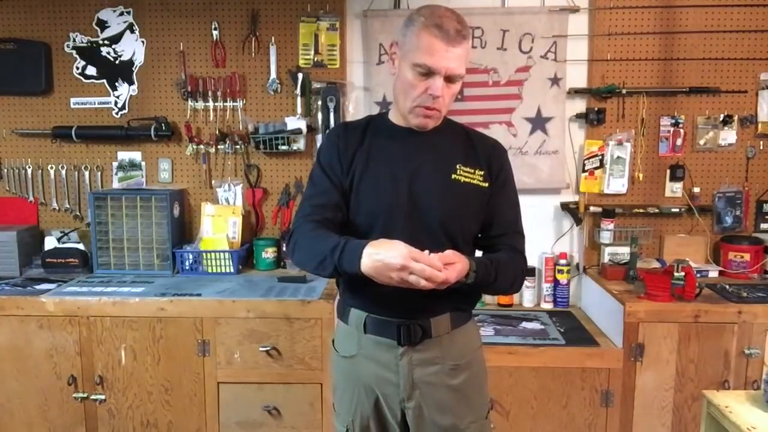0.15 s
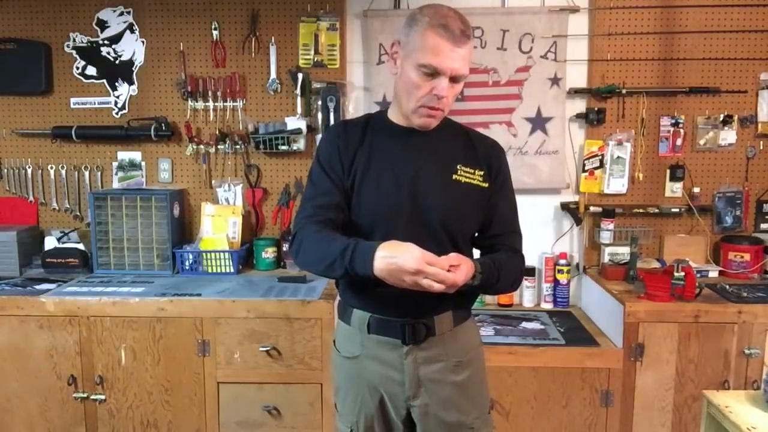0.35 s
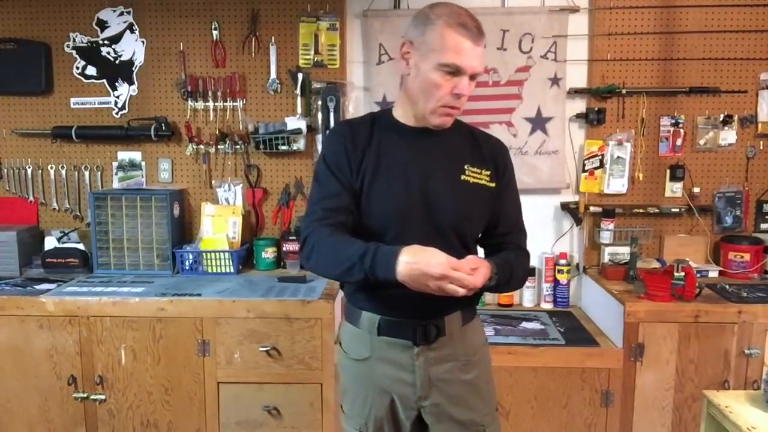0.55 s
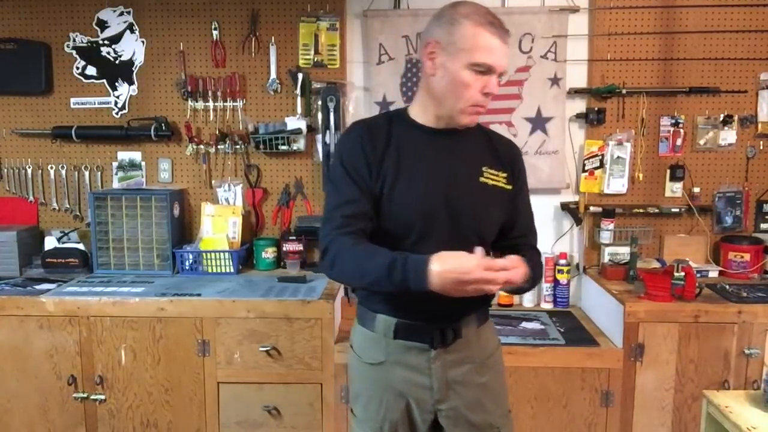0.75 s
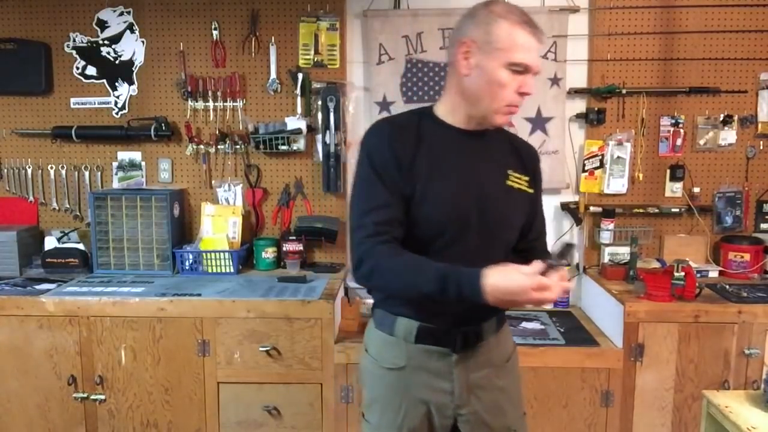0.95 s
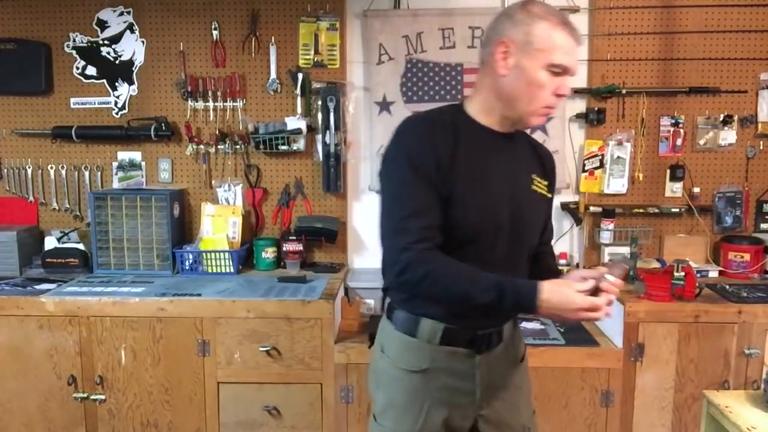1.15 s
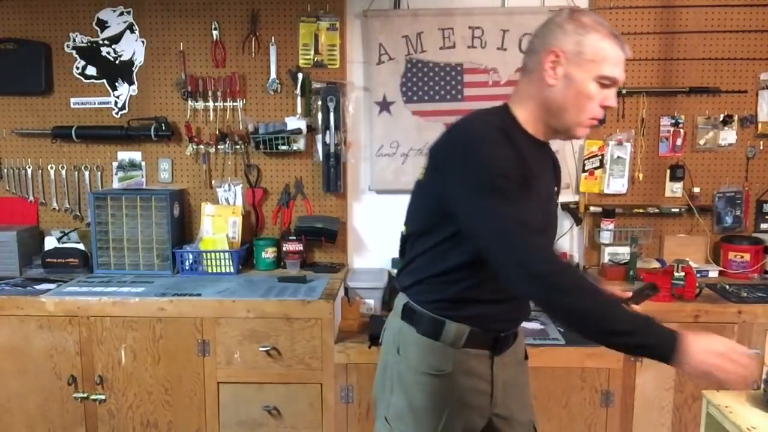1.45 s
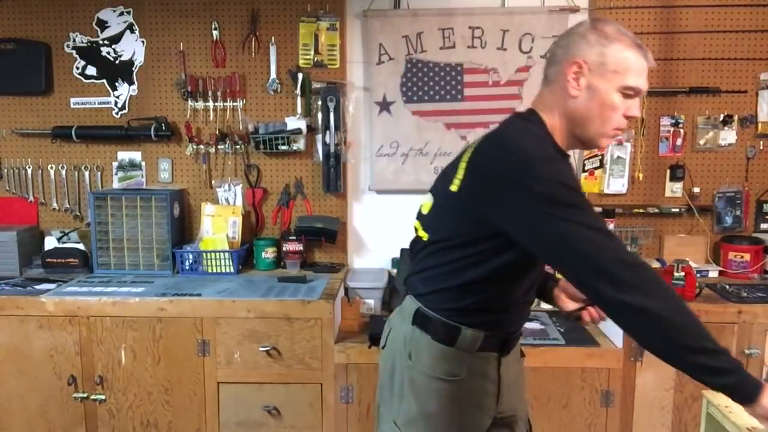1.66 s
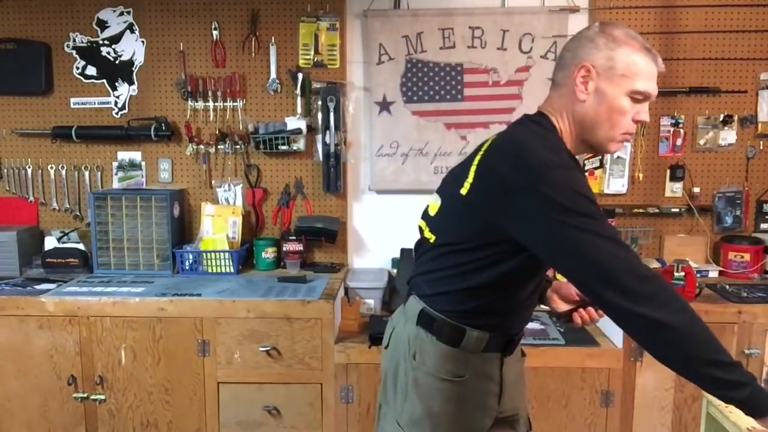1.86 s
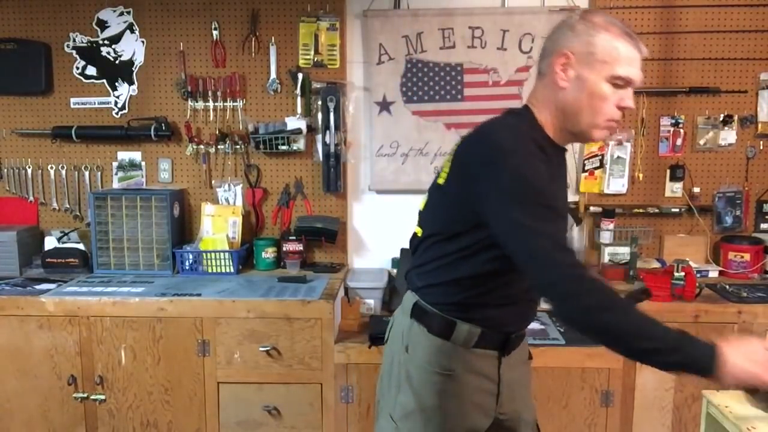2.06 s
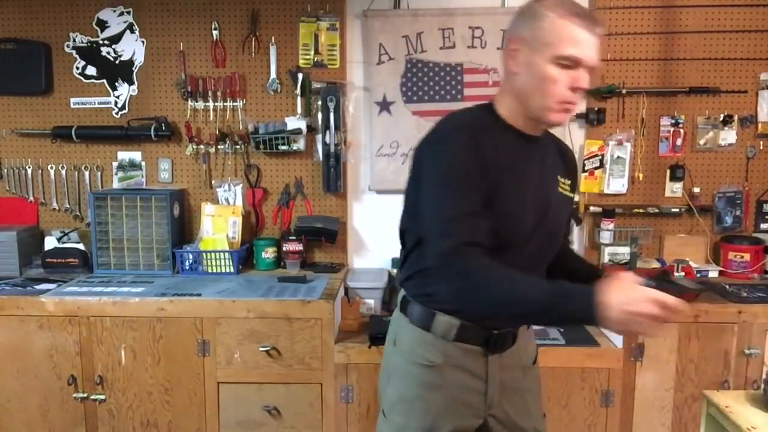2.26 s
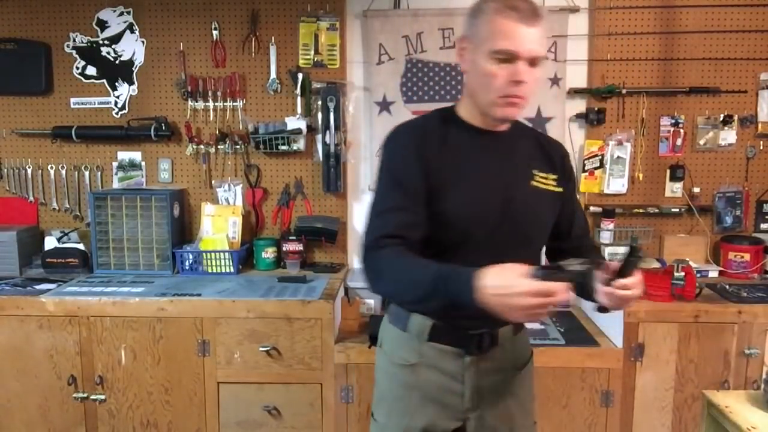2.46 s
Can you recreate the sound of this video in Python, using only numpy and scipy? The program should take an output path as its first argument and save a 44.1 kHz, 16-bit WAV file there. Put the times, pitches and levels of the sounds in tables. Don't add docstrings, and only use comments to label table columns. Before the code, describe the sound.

Metal parts handled at a wooden workbench. A low motor and mains hum drones with light hiss. At 0.4 s a sharp, bright steel spring snap rings briefly in the small room. Faint ticks and growing sleeve rustle follow. From 1.7 to 1.95 s cloth crackles and a part clatters down with hard woody knocks, settling by 2.0 s. A gritty scrape at 2.1 s, a metallic clink at 2.3 s, then faint rustle.

```python
import sys
import numpy as np
from scipy import signal
from scipy.fft import rfft, irfft
from scipy.io import wavfile
from scipy.ndimage import map_coordinates

SR = 44100
rng = np.random.default_rng(int(sys.argv[2]) if len(sys.argv) > 2 else 0)


def volts_from_decibels(level):
    exponent = np.asarray(level, float) / 20
    return 10 ** exponent


def materialize(psi):
    bounded = np.clip(np.atleast_2d(psi).T, -1, 1)
    quanta = np.round(bounded * 32767).astype(np.int16)
    wavfile.write(sys.argv[1], SR, quanta)


N = 114660
T = np.arange(N) / SR


def unit(x):
    return x / np.sqrt(np.mean(x ** 2) + 1e-20)


def along(points, hz):
    f, value = np.transpose(points)
    return np.interp(np.log(hz + 1), np.log(f + 1), value)


def wobble(rate):
    knots = rng.standard_normal(int(N * 400 / SR) + 4)
    return map_coordinates(knots, [T * rate])


def rush(spectrum, grain_db, rate):
    grainy = rng.standard_normal(N) * volts_from_decibels(grain_db * wobble(rate))
    shaped = rfft(grainy) * volts_from_decibels(along(spectrum, np.fft.rfftfreq(N, 1 / SR)))
    return unit(irfft(shaped, N))


def strike(s, db, favour_hz, modes, fall_db, crack, crack_hz):
    cluster, scatter_db = .02, 2
    rise_cycles = 0.44
    t = np.arange(SR // 8) / SR
    hz, level, t60 = np.repeat(np.transpose(modes), repeats=3, axis=1)[:, :, None]
    detune, scatter = rng.uniform(-1.5, 1.5, (2,) + hz.shape)
    level = level + scatter_db * scatter - fall_db * np.abs(np.log2(hz / favour_hz))
    partials = volts_from_decibels(level - 60 * t / t60) * np.sin(2 * np.pi * hz * (1 + cluster * detune) * t)
    ring = partials.sum(0)
    band = signal.butter(3, crack_hz, "band", fs=SR, output="sos")
    noise = unit(signal.sosfilt(band, rng.standard_normal(len(t))))
    x = ring / np.abs(ring).max() + crack * volts_from_decibels(-60 * t / 0.021) * noise
    onset = 1 - np.exp(-t * favour_hz / rise_cycles)
    return np.pad(volts_from_decibels(db) * x * onset, (round(s * SR), N))[:N]


def room(x, colour=((1000, 0),), ridges=()):
    # frequency in Hz, decay time t60 in seconds
    decay = [(200, 0.27), (1200, 0.19), (3000, .29), (9000, 0.27), (12000, 0.19), (16000, 0.12)]
    wall_s = 0.0037
    hz, t, z = signal.stft(rng.standard_normal(SR // 2), SR, nperseg=512)
    colour_db = along(colour, hz)
    for centre_hz, half_width_hz, db in ridges:
        colour_db = colour_db + db / (1 + ((hz - centre_hz) / half_width_hz) ** 2)
    tail_db = colour_db[:, None] - 60 * t / along(decay, hz)[:, None]
    tail = signal.istft(z * volts_from_decibels(tail_db), SR, nperseg=512)[1]
    delayed = np.pad(1. * x, (round(wall_s * SR), 0))
    return signal.fftconvolve(delayed, tail / np.linalg.norm(tail))[:N]


def echo(s, db, colour, ridges=()):
    return volts_from_decibels(db) * room(np.arange(N) == round(s * SR), colour, ridges)


def drone():
    # frequency in Hz, phase in turns
    hum = [(57.14, .9), (59.93, .2), (114.22, .18), (119.87, .64), (239.7, 0), (411.9, .36), (529.5, 0),
           (597, 0), (822, 0), (1915, 0)]
    hum_db = [-30, -60, -47.5, -37, -55.5, -47.5, -53.5, -61, -61, -61]
    # frequency in Hz, room air density in dB per Hz
    air = [(25, -4.5), (70, -9), (180, -5), (300, -14.5), (500, -14), (1200, -24), (2500, -26),
           (15700, -41.5)]
    out = volts_from_decibels(-41.5) * rush(air, grain_db=.7, rate=8)
    for (hz, turns), db in zip(hum, hum_db):
        level = np.sqrt(2) * volts_from_decibels(db + 1.2 * wobble(7))
        out += level * np.sin(2 * np.pi * (hz * T + turns))
    return out


def sleeve():
    # time in seconds, rustle level of the moving arm in dB
    arm = [(0, -73), (.44, -56), (.52, -37), (.6, -54), (.7, -50), (1, -49.5), (1.4, -47), (1.6, -45.5),
           (1.85, -41), (2.05, -46), (2.3, -48), (2.6, -50.5)]
    # frequency in Hz, cloth noise density in dB
    cloth = [(300, -23), (700, -4), (2000, -5.5), (5000, -7.5), (9500, -9), (10500, -17.5), (15500, -19.5)]
    # start in seconds, length in seconds, peak in dB, spikes a second, share of thin ring
    crackle = [
        (1.709, 0.0036, -12.5, 1300, 0.49),
        (1.79, .003, -14, 1300, 0.11),
        (1.794, .0015, -14, 650, 0.24),
        (1.796, 0.0031, -12, 1035, 0.079),
        (1.858, .004, -13, 1000, 0.062),
        (2.026, 0.0025, -19, 800, 0.59),
        (1.256, .002, -31, 800, .3),
        (2.597, .003, -21, 760, 0.15),
    ]
    out, t = np.zeros(N + SR), np.arange(128) / SR
    later = np.arange(12) > 0
    for s, length, db, rate, thin in crackle:
        gap, size = rng.random((2, 12))
        on = np.cumsum((.4 + 1.2 * gap) / rate) * later - later * .3 / rate
        pulse = volts_from_decibels(-60 * t / 0.0013) * (1 - thin + thin * np.cos(2 * np.pi * 9000 * t))
        spikes = np.bincount(np.round(on * SR).astype(int), volts_from_decibels(db - 4.2 * size) * (on < length))
        out[round(s * SR):][:len(spikes) + len(t) - 1] -= np.convolve(spikes, pulse)
    arm_db = np.interp(T, *np.transpose(arm)) + 1.2 * wobble(15)
    return out[:N] + volts_from_decibels(arm_db) * rush(cloth, grain_db=1.5, rate=230)


def drag():
    # start, rise, hold and fall in seconds, level in dB
    slides = [
        (2.097, 0.029, 0.068, 0.073, -34),
        (2.39, 0.044, 0.03, 0.04, -39.5),
        (2, 0.018, 0.014, 0.024, -45),
    ]
    # frequency in Hz, scrape noise density in dB
    scrape = [(600, -12), (1300, -6.5), (2500, 2), (3500, -4.5), (6000, -7), (9000, -9.5), (12000, -20.5),
              (15500, -26)]
    shape = np.zeros(N)
    for s, rise, hold, fall, db in slides:
        shape += volts_from_decibels(db) * np.interp(T, np.cumsum([s, rise, hold, fall]), [0, 1, 1, 0])
    return shape * rush(scrape, grain_db=2, rate=350)


def bench():
    # time in seconds, peak in dB, favoured mode in Hz (higher for a harder contact)
    knock = [(1.7595, -14, 380), (1.761, -28, 1150), (1.7645, -8, 250), (1.768, -22, 1230),
             (1.779, -26, 760), (1.79, -15, 755), (1.797, -11.5, 700), (1.835, -10.5, 480),
             (1.8348, -23, 1150), (1.8385, -8.5, 234), (1.841, -23, 500), (1.859, -18, 1130),
             (1.869, -2.5, 483), (1.8695, -5.5, 766), (1.8738, -13, 250), (1.885, -18, 500),
             (1.9075, 3, 1930), (1.908, -0.5, 1110), (1.9085, -1.5, 500), (1.9105, -1, 780),
             (1.9116, -8, 1120), (1.919, -10, 1660), (1.924, -15, 500), (1.9355, 1.5, 780),
             (1.937, -12.5, 250), (1.9384, -2, 930), (1.941, -10, 796), (1.959, -19.5, 300),
             (1.96, -25, 760), (1.972, -32, 650), (2.315, -24, 774)]
    # board mode in Hz, level in dB, decay time t60 in seconds
    board = [(250, 0, 0.048), (498, 0.5, 0.042), (608, -0.5, 0.021), (774, 3, 0.026), (930, -3, 0.012),
             (1110, 2.5, 0.023), (1580, -13, 0.023), (1666, -2, .035), (1950, -4.5, 0.027),
             (2252, -10, 0.036), (2600, -8, 0.015), (3330, -5, .006), (4350, 1, 0.0057), (5700, -3, .005)]
    # time in seconds, peak in dB, frequency in Hz
    edge = [
        (1.9076, -2.5, 4350),
        (1.9083, -10.5, 7350),
        (1.9104, -7.5, 6000),
        (1.92, -27, 4300),
        (1.9368, -19, 5800),
        (2.004, -22.5, 2740),
        (2.011, -25, 2720),
        (2.0076, -23.5, 4830),
        (2.014, -16.5, 2790),
        (2.0223, -23, 2720),
    ]
    # time in seconds, peak in dB, frequency in Hz
    tick = [(.225, -36, 1470), (0.767, -33, 1380), (1.039, -37, 1410), (1.258, -32.5, 1140),
            (1.31, -36, 1600), (1.472, -36.5, 1020), (1.581, -38, 1380), (1.877, -32, 5360),
            (1.879, -26, 3770), (1.834, -29, 4830), (1.775, -33, 4240), (1.884, -35, 4500)]
    knocks, touches = np.zeros(N), np.zeros(N)
    for s, db, hz in knock:
        knocks += strike(s, db, hz, board, fall_db=12.5, crack=0.2, crack_hz=[0.96 * hz, 2.12 * hz])
    for s, db, hz in edge:
        modes = [(hz, 0, 30 / hz), (1.8 * hz, -10, 20 / hz)]
        touches += strike(s, db, hz, modes, fall_db=0, crack=.12, crack_hz=[.6 * hz, 2.2 * hz])
    for s, db, hz in tick:
        modes = [(hz, 0, 14 / hz)]
        touches += strike(s, db, hz, modes, fall_db=0, crack=0.8, crack_hz=[0.77 * hz, 1.35 * hz])
    return knocks, touches


def steel():
    # time in seconds, peak in dB, favoured frequency in Hz
    snap_hits = [
        (.3904, -24, 2500),
        (0.3911, 4, 2650),
        (0.3915, 2.5, 8500),
        (.3930, 5.5, 4900),
        (0.3944, -1, 3100),
        (0.3947, 6.5, 9800),
        (0.4032, -5, 6000),
        (0.408, 0, 6500),
    ]
    clink_hits = [
        (2.213, -26, 2150),
        (2.2802, -17, 6600),
        (2.2802, -5.5, 2680),
        (2.2817, -17, 2150),
        (2.2827, -13, 2750),
        (2.2915, -15.5, 2750),
        (2.468, -35, 2200),
        (2.595, -35, 3500),
    ]
    # mode in Hz, level in dB, decay time t60 in seconds; the spring, then the heavy part
    spring_modes = [(900, -28, 0.0056), (1550, -7, 0.004), (2200, 0, 0.0057), (2650, 2.5, 0.0078),
                    (3114, -2, 0.025), (4900, 4.5, .013), (6050, -3, 0.0079), (6700, -12, 0.0092),
                    (8300, 6, 0.009), (9030, -10, 0.0056), (9970, 6, 0.0065), (11500, -12, .005),
                    (12700, -14, 0.0058), (14800, -6, .004)]
    heavy_modes = [(1750, -22, 0.014), (2204, -0.5, 0.035), (2500, 0, .015), (2725, 6, 0.018),
                   (3340, -6.5, 0.02), (4170, -5, 0.0086), (6600, -6, 0.0053), (9450, -1.5, 0.0058)]
    # frequency in Hz, density in dB per Hz
    snap_colour = [(700, -35.5), (1570, -20), (2200, -18.5), (3000, -5.5), (3900, -13), (6000, -5),
                   (9500, -10.5), (15600, -22)]
    clink_colour = [(900, -38), (1720, -15), (2200, -8), (2740, -8), (3400, -6), (4400, -18), (7000, -24),
                    (12000, -34)]
    # centre in Hz, half width in Hz, height in dB
    snap_ridges = [(3110, 120, 6), (4870, 170, 7), (6000, 120, 1.5), (8400, 120, 7.5), (8700, 110, 5),
                   (9800, 170, 9), (11300, 110, 2)]
    clink_ridges = [(2700, 120, 7.5)]
    snap = sum(strike(*hit, spring_modes, fall_db=7, crack=0.36, crack_hz=[2400, 10200]) for hit in snap_hits)
    clink = sum(strike(*hit, heavy_modes, fall_db=4.5, crack=0.31, crack_hz=[1900, 3600]) for hit in clink_hits)
    snap_wash = echo(.394, 25.5, snap_colour, snap_ridges)
    clink_wash = echo(2.281, 0, clink_colour, clink_ridges)
    return snap + snap_wash + clink + clink_wash


def scene():
    # frequency in Hz, density in dB per Hz
    clack_colour = [(1200, -30), (2200, -6), (3000, -2), (4400, -4), (5600, -4), (7000, -3), (10000, -11),
                    (15600, -28)]
    wood, edges = bench()
    wash = room(volts_from_decibels(-6) * wood + volts_from_decibels(-8.5) * edges)
    wash = wash + echo(1.908, -5, clack_colour)
    return (drone() + sleeve() + drag() + wood + edges + wash + steel())[None]


def roll_off(x):
    return signal.sosfilt(signal.butter(12, 15780, fs=SR, output="sos"), x)


def record(dry):
    # time in seconds, gain in dB
    gain = [(0, -2), (.391, -2), (.41, -11), (.6, -9.5), (1.05, -3), (1.42, -2.5), (1.55, -1.5),
            (1.76, -0.5), (1.86, -2), (1.96, -5), (2, -4), (2.2, -1.5), (2.35, -1.5), (2.47, -1.5),
            (2.6, -1)]
    hiss_db, hiss_ducks = -51.5, 0.43
    top, top_hz = .98, 15800
    gain_db = np.interp(T, *np.transpose(gain))
    hiss = volts_from_decibels(hiss_db + hiss_ducks * gain_db) * rng.standard_normal(dry.shape)
    clipped = np.clip(dry * volts_from_decibels(gain_db) + hiss, -top, top)
    x = irfft(rfft(clipped) * (np.fft.rfftfreq(N, 1 / SR) < top_hz), N)
    return roll_off(np.clip(x, -1, 1))


dry = scene()
out = record(dry)
materialize(out)
```